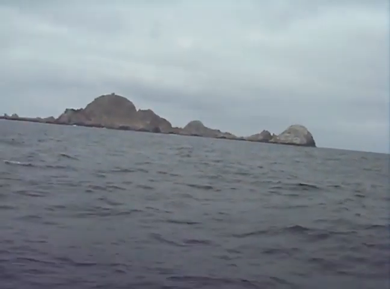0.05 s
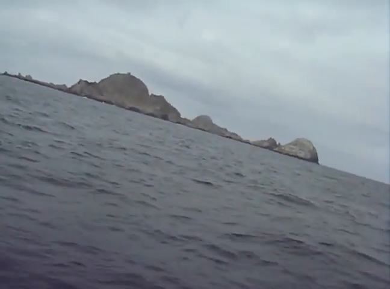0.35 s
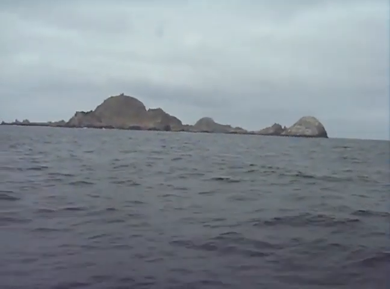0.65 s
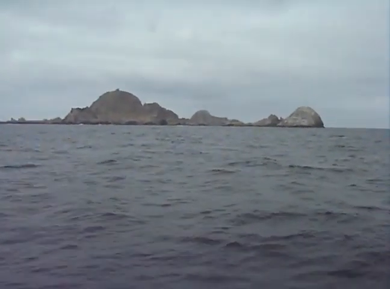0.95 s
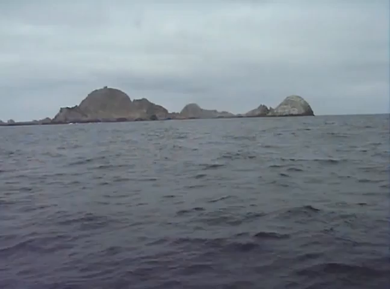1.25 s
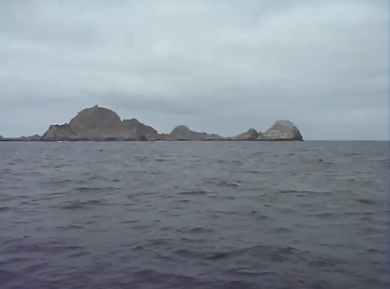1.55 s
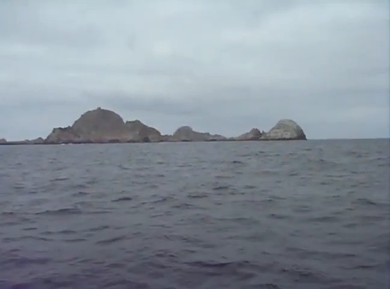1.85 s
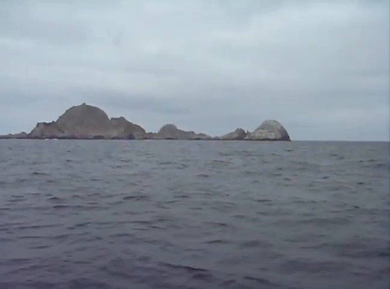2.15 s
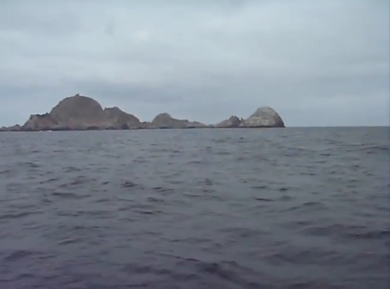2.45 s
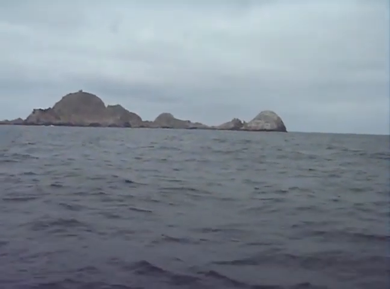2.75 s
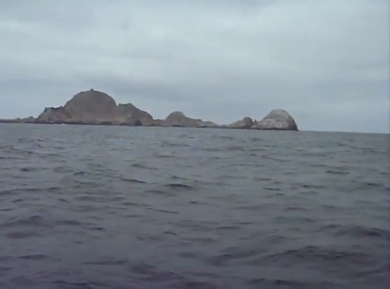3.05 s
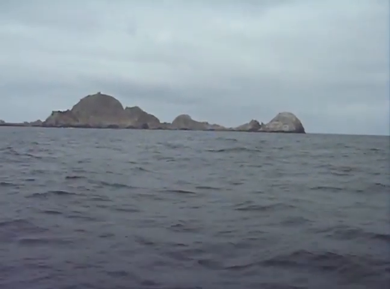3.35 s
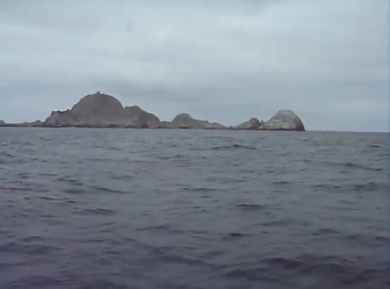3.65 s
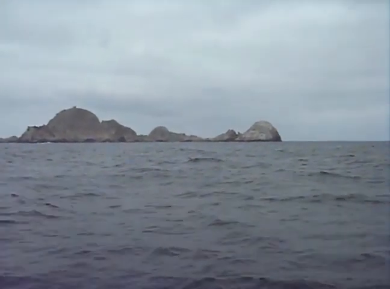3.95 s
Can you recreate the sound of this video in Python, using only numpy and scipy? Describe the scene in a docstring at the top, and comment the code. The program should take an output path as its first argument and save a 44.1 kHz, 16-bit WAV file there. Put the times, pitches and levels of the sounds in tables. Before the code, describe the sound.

Gusts of wind hit the microphone directly with pops, crackle and bass thumps, ease into a short lull, then come back in uneven bursts. Underneath, water hisses along the boat's hull and the engine drones faintly.

```python
"""Aboard a boat in choppy water, with a small camera microphone out in gusty wind.
Right on the microphone port, long gusts and short puffs flutter and crackle, brighter as they
blow harder; single eddies pop and large slow ones thud in the bass.
Underneath, water hisses along the hull, a few wavelets splash and the engine drones dully."""
import sys
import numpy as np
from scipy import signal
from scipy.fft import rfft, irfft, next_fast_len
from scipy.io import wavfile
from scipy.ndimage import map_coordinates

SR = 44100
rng = np.random.default_rng(int(sys.argv[2]) if len(sys.argv) > 2 else 0)


def dump_mix(stems):
    """Bounce the given channels to the path in sys.argv[1] as a 16-bit WAV at rate SR."""
    frames = np.atleast_2d(stems).T  # one column per channel
    limited = np.clip(frames, -1, 1)  # hard clip at full scale
    pcm = np.round(limited * 32767).astype(np.int16)
    wavfile.write(sys.argv[1], SR, pcm)


N = 176400

# Brightness as the wind veers across the microphone. Each row: time in seconds, treble lift in dB.
VEERING = [(0, 2), (.2, 2.5), (.33, 8.5), (.45, 9.5), (.64, 7.5), (.76, -5.5), (1.2, -10.5), (2.3, -6),
           (2.75, -1.5), (3, -2), (3.55, -4.5), (3.72, -8), (4, -14)]
# The wind's dull body and sharp edge at the port. Each row: frequency in Hz, relative level in dB.
BODY_SPECTRUM = [(30, -54), (150, -33), (300, -11), (500, -2), (800, 2), (1200, -1), (1750, -6.5),
                 (2500, -22), (3500, -62), (8000, -75)]
EDGE_SPECTRUM = [(200, -23), (700, -7), (1300, 1.5), (1800, -0.5), (2500, -4), (3200, -14.5), (4200, -55),
                 (7000, -31), (13000, -56)]
STRONG_DB = -31.5  # a strong wind; every GROWTH is in dB per dB above this level
EDGE_DB, EDGE_GROWTH, DENSITY_GROWTH = -34, 1.46, 1.02


def wind():
    """Eddies beat on the port; harder wind sheds more, and its edge grows faster than its body."""
    level_db = wind_level()
    excess_db = np.minimum(level_db - STRONG_DB, 6)
    treble_db = curve(VEERING)
    eddies_per_s = 200 + 900 * amp(treble_db + DENSITY_GROWTH * excess_db)
    eddies = grains(eddies_per_s, spread_db=1, smooth=.095)
    body = amp(level_db) * coloured(eddies, BODY_SPECTRUM)
    sharpness = amp(wobble(2 * FLUTTER_PER_S))  # some eddies are sharper than others
    edge_kicks = signal.hilbert(eddies * sharpness).imag  # a quarter cycle out of phase
    edge = amp(EDGE_DB + EDGE_GROWTH * excess_db + treble_db) * coloured(edge_kicks, EDGE_SPECTRUM)
    return body + edge + crackle(excess_db, treble_db)


# Long gusts reaching the microphone. Each row: time in seconds, level in dB.
GUSTS = [(0, -26.5), (.07, -28.5), (.15, -28), (.24, -30), (.35, -36), (.41, -38), (.43, -43.5),
         (.5, -35.5), (.6, -34), (.72, -31.5), (.735, -34.5), (.78, -33.5), (.82, -36), (.95, -36.5),
         (1.03, -37.5), (1.09, -47), (1.22, -50), (1.3, -57), (1.83, -81), (1.91, -59), (2.03, -45.5),
         (2.3, -39), (2.52, -45.5), (2.6, -41.5), (2.645, -28.5), (2.69, -30), (2.73, -27), (2.8, -24),
         (2.85, -32.5), (2.935, -45), (3.01, -35.5), (3.1, -38), (3.2, -47.5), (3.29, -45.5), (3.43, -40.5),
         (3.48, -45.5), (3.63, -48.5), (3.69, -41), (3.82, -42), (3.9, -42.5), (4, -53)]
# How fitful the gusts are. Each row: time in seconds, flutter depth in dB.
FLUTTER_DEPTH = [(0, 4), (.4, 0.5), (.7, 1), (.95, 3), (2.1, 9.5), (2.75, 1), (3.2, 5.5), (4, 3)]
# Short puffs straight on the port. Each row: start in seconds, length in seconds, level in dB.
SHORT_PUFFS = [(0.237, 0.0071, -23.5), (0.704, 0.018, -37), (1.124, 0.011, -34), (1.191, 0.013, -37),
               (1.238, 0.005, -28.5), (1.989, 0.0095, -38), (2.056, 0.0057, -31), (2.126, 0.0071, -31.5),
               (2.209, 0.016, -32.5), (2.24, 0.016, -37.5), (2.267, 0.026, -33.5), (2.309, 0.026, -29),
               (2.383, 0.049, -31.5), (2.453, 0.047, -34), (2.555, 0.012, -29.5), (2.608, 0.02, -32.5),
               (2.873, 0.044, -29.5), (2.951, 0.042, -28), (3.068, 0.013, -34.5), (3.266, 0.0086, -30),
               (3.31, 0.032, -28.5), (3.382, .035, -37.5), (3.5, 0.028, -37), (3.579, 0.012, -39),
               (3.662, 0.03, -29), (3.72, 0.043, -32.5), (3.777, 0.05, -29.5), (3.845, 0.035, -29),
               (3.913, 0.0085, -27), (3.944, .011, -28), (3.966, 0.0082, -28), (3.985, 0.0081, -25)]
FLUTTER_PER_S, PUFF_RAMP_S = 150, .0023


def wind_level():
    """Gusts shaken by fast turbulence, plus steady short puffs, in dB."""
    turbulence = np.minimum(wobble(FLUTTER_PER_S), 1.3)
    depth_db = curve(FLUTTER_DEPTH)
    trim_db = depth_db ** 2 / 20  # offsets the power that deep flutter adds
    power = amp(curve(GUSTS) + depth_db * turbulence - trim_db) ** 2
    t = clock()
    for start, length, db in SHORT_PUFFS:
        inside_s = np.minimum(t - start, start + length - t)
        power += amp(db) ** 2 * np.clip(inside_s / PUFF_RAMP_S + .5, 0, 1)
    return 10 * np.log10(power)


# Crackle right at the microphone. Each row: frequency in Hz, relative level in dB.
CRACKLE_SPECTRUM = [(500, -27), (2000, 0.5), (3200, 8), (4500, -3), (6000, -12.5), (9000, -11),
                    (11000, -15), (13000, -33)]
CRACKLE_DB, CRACKLE_GROWTH = -48.5, 1.73


def crackle(excess_db, treble_db):
    """Bright spits of widely differing size, rising steeply with the wind's force and brightness."""
    spits = coloured(grains(rate=650, spread_db=6, smooth=.2), CRACKLE_SPECTRUM)
    return amp(CRACKLE_DB + CRACKLE_GROWTH * excess_db + 1.5 * treble_db) * spits


# Lone eddies hitting the port. Each row: time in seconds, pop peak in dB, snap peak in dB.
EDDY_POPS = [(.025, -6.5, -16.5), (.085, -5.5, -22.5), (.0968, -4.5, -41), (0.104, -14, -23),
             (.114, -13, -25), (.128, -14, -23), (0.1356, -6, -21), (.152, -16, -18.5), (0.2383, -5.5, -32),
             (.244, -12.5, -32), (.332, -17, -16.5), (0.352, -13, -28), (.716, -14, -40),
             (.946, -15.5, -47), (.963, -21, -40), (.995, -23, -41), (1.02, -22.5, -43),
             (1.051, -20, -35.5), (1.194, -23, -39), (1.218, -31, -38), (1.242, -15, -41),
             (1.853, -29.5, -50), (1.973, -26, -50), (2.003, -24, -51), (2.058, -29, -37),
             (2.083, -22.5, -37), (2.0985, -20, -33), (2.157, -30, -47), (2.173, -20.5, -41),
             (2.259, -21, -58), (2.27, -18.5, -59), (2.343, -13.5, -41), (2.416, -17, -40),
             (2.483, -20, -51), (2.535, -22.5, -44), (2.578, -20, -42), (2.614, -15, -37),
             (2.667, -12.5, -24.5), (2.778, -10, -23), (2.939, -16, -35), (2.988, -9, -20),
             (3.003, -16.5, -35), (3.067, -23, -30), (3.121, -19.5, -36), (3.136, -21.5, -57),
             (3.184, -22, -43), (3.237, -24.5, -44.5), (3.254, -19, -37), (3.27, -16.5, -50),
             (3.282, -24, -38), (3.306, -13, -41), (3.314, -15.5, -25), (3.355, -30, -49),
             (3.508, -19.5, -35), (3.572, -28, -37), (3.649, -13.5, -35.5), (3.714, -11.5, -38),
             (3.811, -15, -30), (3.913, -17, -52), (3.947, -18, -57), (3.989, -25, -42)]
POP_HZ, LOUD_SNAP_DB, SNAP_DB_PER_OCTAVE = 1326, -25, 28  # pitch at a loud snap; softer is lower


def pops():
    """Each lone eddy is one dry swing of pressure, with a much shorter snap on top."""
    t, out = clock(), np.zeros(N)
    for time, pop_db, snap_db in EDDY_POPS:
        phase = rng.uniform(0, 2 * np.pi)
        near = np.abs(t - time) < .005
        age = t[near] - time
        hz = POP_HZ * 2 ** ((snap_db - LOUD_SNAP_DB) / SNAP_DB_PER_OCTAVE)
        pop = amp(pop_db) * swing(age, hz, cycles=.32, phase=phase)
        snap = amp(snap_db) * swing(age, hz=2200, cycles=.19, phase=phase + np.pi / 2)
        out[near] += pop + snap
    return out


# Wind meeting the microphone head-on. Each row: time in seconds, bass level in dB.
BUFFETING = [(0, -28), (.22, -32), (.33, -36), (.43, -51.5), (.68, -45), (1.03, -59.5), (1.28, -76),
             (1.82, -53.5), (2.02, -45), (2.55, -48.5), (2.76, -50.5), (3.05, -42.5), (3.25, -44.5),
             (3.63, -43.5), (3.71, -31.5), (3.82, -31.5), (3.9, -36.5), (4, -37.5)]
# Its thuds at the port. Each row: frequency in Hz, relative level in dB.
THUD_SPECTRUM = [(25, -50), (60, -35.5), (120, -17.5), (220, -3.5), (340, 1), (500, 0), (800, -4.5),
                 (1500, -25), (4000, -80)]
THUMP_HZ, THUMP_DB, THUMP_GROWTH = 130, 4.5, .8


def buffet():
    """Large slow eddies thud in the bass; their deep end swells in strong wind."""
    level_db = curve(BUFFETING)
    thuds = coloured(grains(rate=540, spread_db=.5, smooth=.3), THUD_SPECTRUM)
    deep = filtered(thuds, lambda hz: 1 / (1 + (hz / THUMP_HZ) ** 4))
    thump = amp(THUMP_DB + THUMP_GROWTH * (level_db - STRONG_DB)) * deep
    return amp(level_db + 1.8 * wobble(45)) * (thuds + thump)


# Water along the hull, farther from the microphone. Each row: time in seconds, level in dB.
HULL_WASH = [(0, -52), (.4, -48.5), (.8, -45.5), (1.15, -48), (1.9, -50.5), (4, -51)]
# Wavelets breaking by the boat. Each row: peak time in seconds, half-width in seconds, level in dB.
WAVELETS = [(0.645, 0.0096, -35.5), (0.974, 0.013, -40.5), (1.55, 0.064, -48)]
# Wash and wavelets as heard on board. Each row: frequency in Hz, relative level in dB.
WASH_SPECTRUM = [(25, -17), (100, -1), (400, -4), (900, -1.5), (1500, -3), (2800, -4), (4200, -8),
                 (6500, -10.5), (9500, -12.5), (11500, -22.5), (13000, -33)]
WAVELET_SPECTRUM = [(200, -37), (900, 1), (2000, 2), (3500, -1.5), (6000, -7), (9000, -11.5), (13000, -37)]


def water():
    """A fine fizz along the hull, swelling where a wavelet breaks."""
    wash_gain = amp(curve(HULL_WASH) + .12 * wobble(5.26))
    fizz = coloured(grains(rate=3000, spread_db=5, smooth=.53), WASH_SPECTRUM)
    swell = sum(amp(db) * np.exp(-.5 * ((clock() - time) / width) ** 2) for time, width, db in WAVELETS)
    spray = coloured(grains(rate=1900, spread_db=8, smooth=.41), WAVELET_SPECTRUM)
    return wash_gain * fizz + swell * spray


# The boat's engine, in the background. Each row: frequency in Hz, relative level in dB.
ENGINE_SPECTRUM = [(50, -39), (95, -7), (170, -5), (260, 1.5), (420, 10.5), (700, -2), (1500, -18),
                   (5000, -70)]
ENGINE_DB = -55.5


def engine():
    """A dull, slightly wavering drone with no clear pitch."""
    return amp(ENGINE_DB + .73 * wobble(7.84)) * coloured(rng.standard_normal(N), ENGINE_SPECTRUM)


def grains(rate, spread_db, smooth):
    """Random pressure kicks of uneven size, rate a second, with a share of smooth noise."""
    due = rng.random(N) < rate / SR
    signs = np.sign(rng.standard_normal(N))
    sizes = amp(spread_db * np.clip(rng.standard_normal(N), -2, 2))
    kicks = unit(due * signs * sizes / np.sqrt(rate))  # equal power, sparse or dense
    return np.sqrt(1 - smooth) * kicks + np.sqrt(smooth) * rng.standard_normal(N)


def swing(age, hz, cycles, phase):
    """One short swing of pressure with peak 1; cycles is its half-width."""
    wave = np.gradient(np.cos(2 * np.pi * hz * age + phase) / np.cosh(hz * age / cycles) ** 2)
    return wave / np.abs(wave).max()


def amp(db):
    """Decibels to gain."""
    return 10 ** (np.asarray(db) / 20)


def unit(x):
    """Scaled to rms 1."""
    return x / np.sqrt(np.mean(x ** 2) + 1e-20)


def clock():
    """The time of each sample in seconds."""
    return np.arange(N) / SR


def curve(rows):
    """(seconds, value) points joined by straight lines."""
    return np.interp(clock(), *np.transpose(rows))


def wobble(rate):
    """A smooth random curve, rate knots a second."""
    return map_coordinates(rng.standard_normal(N // 20), [clock() * rate], mode="wrap")


def filtered(x, response):
    """x through a filter whose gain is response(hz)."""
    size = next_fast_len(N + SR // 2)
    return irfft(rfft(x, size) * response(np.fft.rfftfreq(size, 1 / SR)), size)[:N]


def coloured(x, spectrum):
    """x shaped by a spectrum, at rms 1."""
    knots_hz, db = np.transpose(spectrum)
    return unit(filtered(x, lambda hz: amp(np.interp(np.log(hz + 1), np.log(knots_hz + 1), db))))


def scene():
    """Wind on the port over water and engine, in mono."""
    return (wind() + buffet() + pops() + water() + engine())[None]


def record(dry):
    """The camera keeps nothing above 13 kHz."""
    return np.array([filtered(channel, lambda hz: hz < 13000) for channel in dry])


dry = scene()
out = record(dry)
dump_mix(out)
```